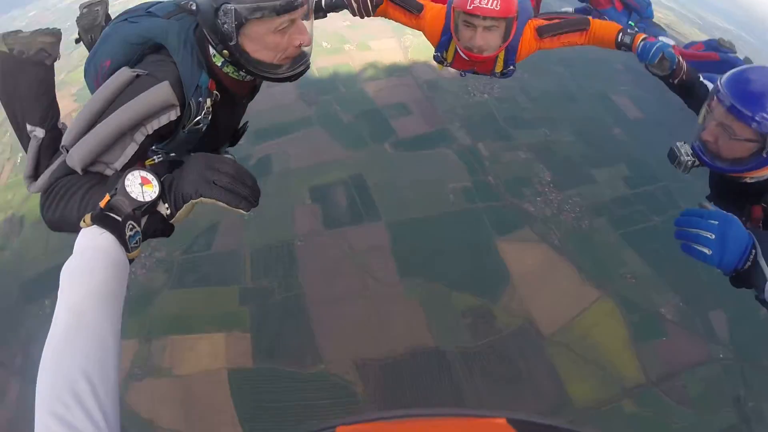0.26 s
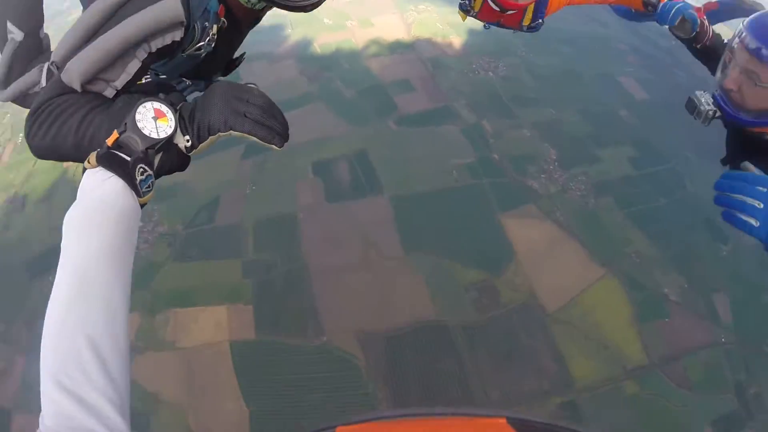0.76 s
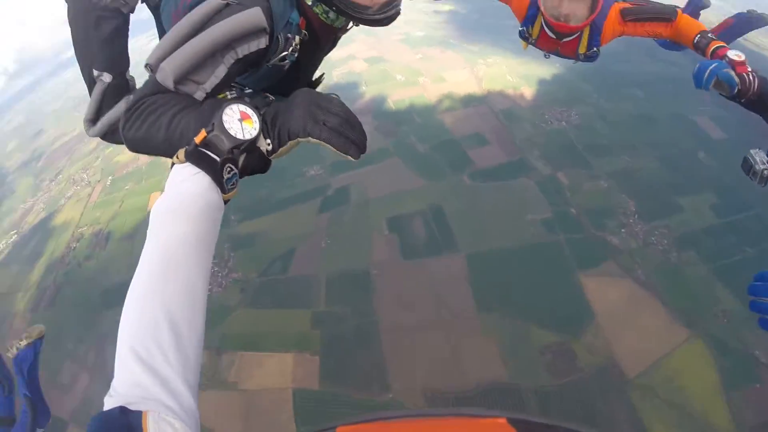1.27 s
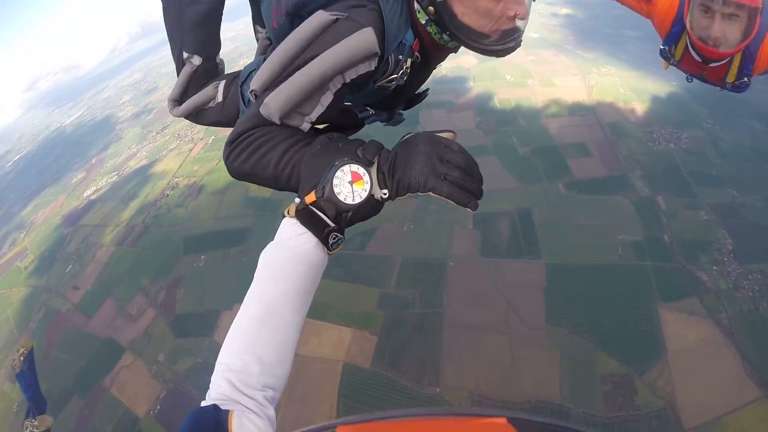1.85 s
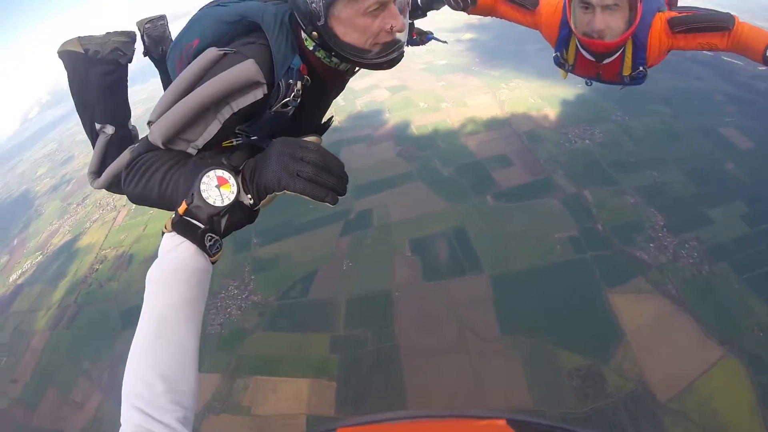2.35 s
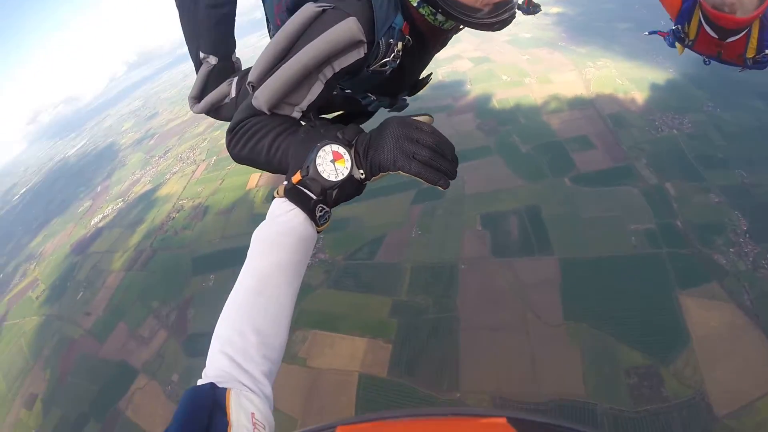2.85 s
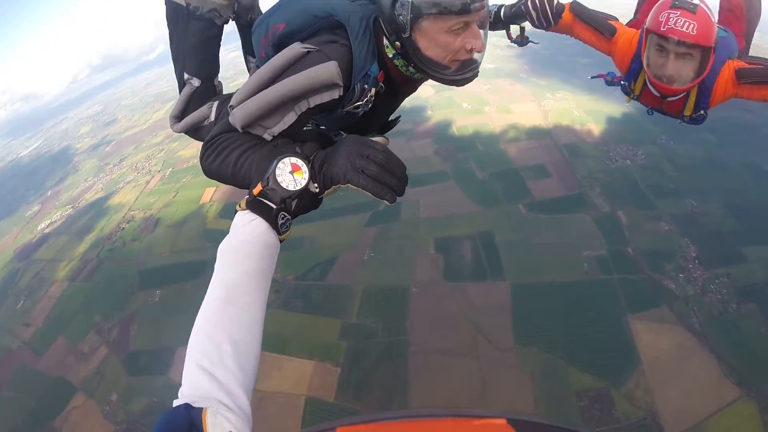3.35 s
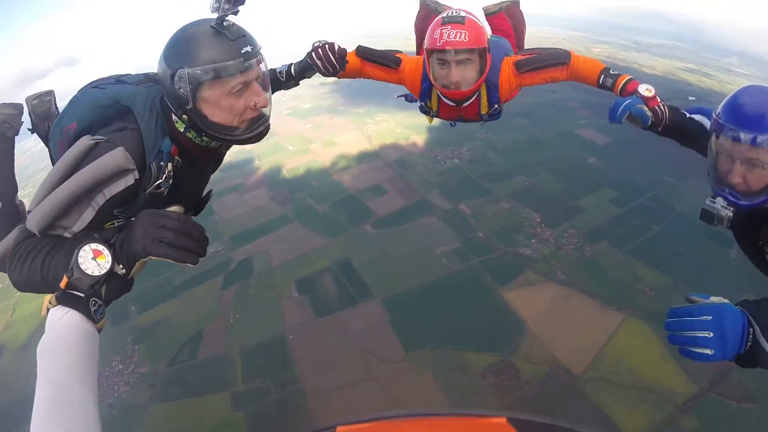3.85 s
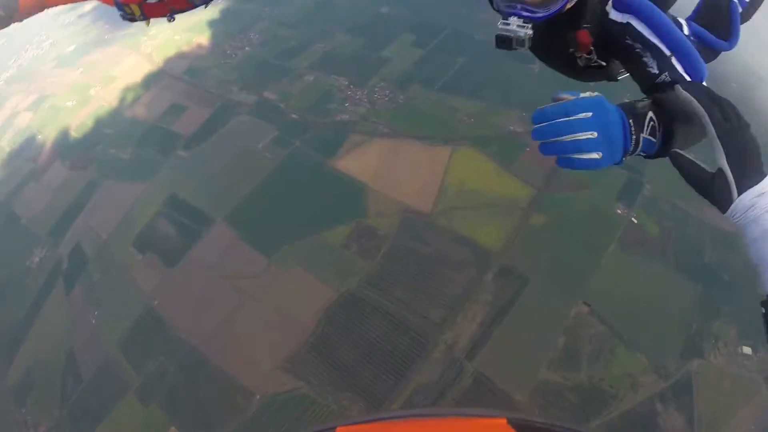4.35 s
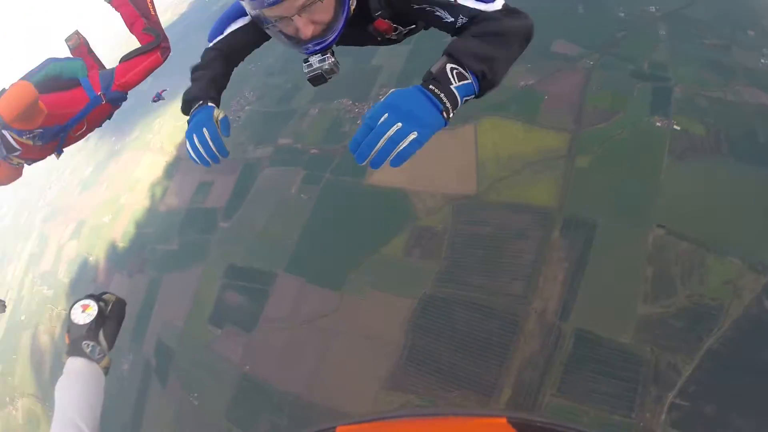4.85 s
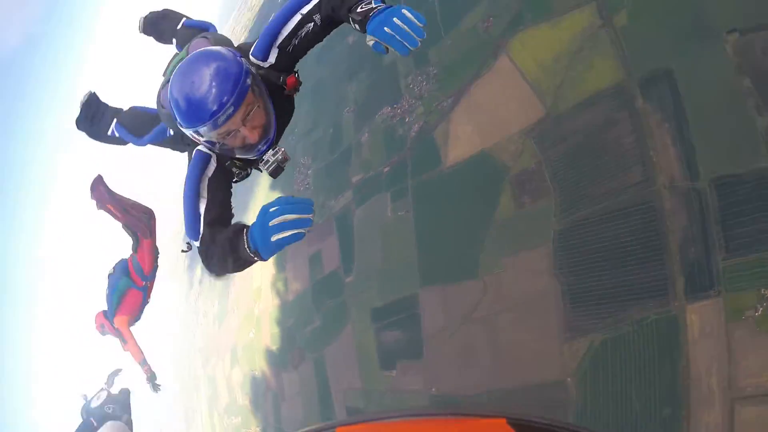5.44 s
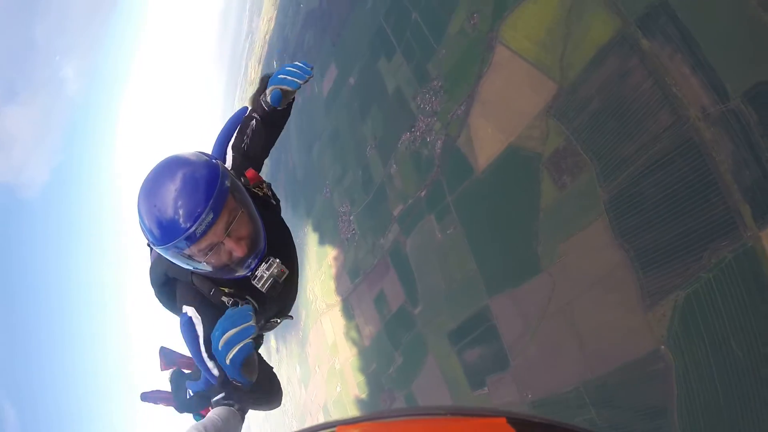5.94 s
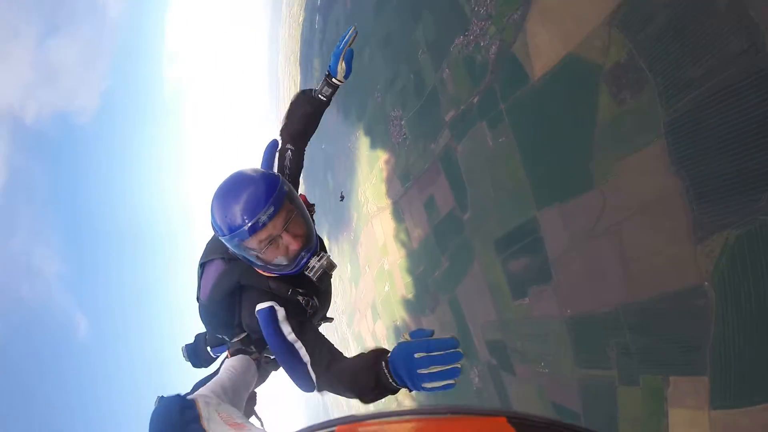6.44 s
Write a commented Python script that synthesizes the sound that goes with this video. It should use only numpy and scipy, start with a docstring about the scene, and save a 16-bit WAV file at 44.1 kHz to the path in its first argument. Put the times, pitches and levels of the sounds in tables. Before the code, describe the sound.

Loud boxy wind hiss and deep buffeting roar in open sky, stuttering with dropouts, ending as a smoother, brighter rush.

```python
"""In the open sky, in freefall: air tears past a helmet camera.
Shaped noise hisses through the resonances of the sealed case; a wavering tone near 50 Hz is the throb of eddies
shed from the helmet. Low noise roars, and hiss and roar flicker, flare and drop out in the buffeting.
A faint hum and one singing resonance add tone. Near the end the head turns out of the wake:
the rumble falls away and the hiss steadies."""
import sys
import numpy as np
from scipy import signal
from scipy.fft import rfft, irfft, next_fast_len
from scipy.io import wavfile
from scipy.ndimage import uniform_filter1d, minimum_filter1d, map_coordinates

SR = 44100
rng = np.random.default_rng(int(sys.argv[2]) if len(sys.argv) > 2 else 0)


def dump_mix(stems):
    """Bounce the given channels to the path in sys.argv[1] as a 16-bit WAV at rate SR."""
    frames = np.atleast_2d(stems).T  # one column per channel
    limited = np.clip(frames, -1, 1)  # hard clip at full scale
    pcm = np.round(limited * 32767).astype(np.int16)
    wavfile.write(sys.argv[1], SR, pcm)


N = 294588  # length in samples

# A faint, wavering low hum. Each row: time in seconds, middle pitch in Hz, middle level in dB.
HUM_PATH = [(0, 162, -46), (2.8, 164.5, -51), (3.5, 165, -33), (4.3, 160, -44), (5.7, 160.4, -42),
            (6.2, 155, -36.5), (6.68, 140.3, -36)]
# One case resonance sings out as the head turns. Each row: time in seconds, level in dB.
SINGING_LEVEL = [(0, -50), (4.1, -52), (4.35, -27), (4.6, -49), (5.3, -35), (5.6, -21), (5.8, -26),
                 (6.1, -38), (6.68, -33)]
# That resonance: its centre in Hz, its width in Hz.
SINGING_RESONANCE = (2270, 300)
# How often the helmet sheds eddies. Each row: time in seconds, middle rate in eddies a second.
SHEDDING_RATE = [(0, 55), (1.2, 54), (1.8, 49), (2.7, 55), (3.3, 52), (4.8, 53), (5.7, 60), (6.68, 62)]
# Bursts of strong shedding. Each row: centre in seconds, level in dB, rough length in seconds.
SHEDDING_BURSTS = [(0.045, -14, 0.036), (0.215, -19.5, 0.1), (0.78, -18, 0.027), (0.905, -20, 0.041),
                   (1.04, -17.5, 0.08), (1.198, -22, 0.039), (1.3, -15.5, 0.099), (1.59, -21.5, 0.069),
                   (1.681, -16.0, 0.08), (1.818, -15, 0.06), (2.014, -15.5, 0.045), (2.117, -22, 0.058),
                   (2.294, -16, 0.1), (2.417, -17, 0.052), (2.506, -16.5, 0.082), (2.6, -20, 0.043),
                   (2.687, -12.5, 0.044), (2.822, -19.0, 0.067), (3.054, -18.0, 0.033), (3.096, -12, 0.033),
                   (3.208, -16.0, 0.05), (3.275, -18.0, 0.047), (3.359, -13.5, 0.054), (3.465, -20, 0.037),
                   (3.547, -15, 0.068), (3.62, -11, 0.018), (3.758, -19, 0.035), (3.932, -18.0, 0.052),
                   (3.994, -12.5, 0.02), (4.387, -25, 0.047), (4.726, -20, 0.098), (4.831, -21, 0.04),
                   (4.93, -18.5, 0.059), (5.034, -22.0, 0.044), (5.07, -26, 0.036), (5.228, -24, 0.043)]
# Slow pressure swings under the throb. Each row: frequency in Hz, relative level in dB per Hz.
SWING_SPECTRUM = [(8, -30), (16, -3), (30, 0.5), (45, -7.5), (65, 0.5), (80, -5), (120, -47), (300, -120)]
# The wake over time. Each row: time in seconds, throb between bursts in dB, roar in dB,
# upper part of the roar in dB above the roar, flicker depth in dB (held between 0 and 9).
WAKE_PATH = [(0, -32, -28.5, -6, 4), (.6, -25, -25.5, -5, 2), (1.1, -28, -26.5, -5.5, 3),
             (1.5, -25, -25.5, -4.5, 3), (2.2, -28, -27, -6, 3.5), (3.0, -26, -27.5, -5.5, 4.5),
             (3.9, -25.5, -28, -4.5, 5.5), (4.2, -24, -27, -1.5, 2.5), (4.45, -29.5, -29.5, -5.5, 4.5),
             (5.15, -32, -29.5, -0.5, 2.1), (5.38, -28, -24.5, -2.5, 0), (5.58, -33.5, -32.5, -2.5, 1.5),
             (5.97, -29.5, -32, -9, 2), (6.05, -39, -39.5, -9, 1.2), (6.45, -38, -37.5, -6, -0.3),
             (6.68, -34.5, -33.5, -8, 0.3)]
# Spectrum of the lower roar. Each row: frequency in Hz, relative level in dB per Hz.
ROAR_SPECTRUM = [(20, -22), (70, 1), (100, 2.5), (160, -2), (220, -2.5), (300, -17), (400, -30.5),
                 (800, -120)]
# Spectrum of the upper roar. Each row: frequency in Hz, relative level in dB per Hz.
UPPER_ROAR_SPECTRUM = [(120, -120), (230, -7), (300, -2), (500, -5.5), (750, -8.5), (950, -4), (1100, -5.5),
                       (1500, -2.5), (3000, -120)]
# Sudden falls, then a climb back. Each row: start in seconds, fall of the hiss in dB, recovery in seconds.
SUDDEN_SAGS = [(.062, -5.5, 0.15), (.95, -3.5, 0.061), (1.31, -5, 0.19), (1.83, -5.5, 0.15),
               (2.69, -4.5, 0.14), (3.11, -3.5, 0.17), (3.384, -7, 0.09), (3.633, -9, 0.042),
               (3.944, -5, 0.067), (5.276, -6.5, 0.073), (5.365, -5.5, 0.14)]
# Brief flares (+) and drop-outs (-). Each row: centre in seconds, change in dB before each sound
# takes its share, length in seconds.
BRIEF_FLICKS = [(0.043, 6, 0.014), (0.063, -10, .012), (.152, -8, .009), (0.192, -6, .01),
                (0.207, -8, 0.014), (0.384, -5, .012), (0.701, -13, .009), (0.71, 5, 0.02),
                (.772, 3, 0.0069), (1.072, -9, .007), (1.632, -16, 0.017), (1.673, 4.5, .016),
                (1.689, -13, 0.0046), (1.726, -11, 0.018), (2.069, -9, 0.014), (2.118, -10, 0.01),
                (2.132, 8, 0.0098), (2.419, -21, 0.0057), (2.511, -8, 0.0062), (2.53, -11, 0.0062),
                (2.56, -9, 0.0079), (2.43, 8.5, 0.023), (2.596, 9, 0.0085), (2.678, 4, 0.013),
                (2.692, -22, 0.014), (2.723, -7, 0.013), (2.807, 9, 0.0084), (2.928, 6, 0.0068),
                (3.112, -1, 0.005), (3.138, -17, 0.0094), (3.195, 4, 0.0061), (3.259, 7.5, 0.01),
                (3.344, 9, 0.0067), (3.362, -2, 0.0064), (3.405, -7, .007), (3.442, -12, .008),
                (3.527, -4, 0.0092), (3.554, 5, 0.01), (3.614, -3, 0.011), (3.687, -15, .007),
                (3.696, 10.5, 0.016), (3.712, -9, .007), (3.833, -11, 0.011), (3.867, -12, 0.0065),
                (3.87, 14, .005), (3.9, 5, 0.0053), (3.913, -19, .007), (3.916, 9, 0.0086),
                (3.94, 11, 0.0064), (3.967, -20, 0.032), (3.978, 12, .011), (4.006, -10, 0.025),
                (4.022, 8.5, 0.0091), (4.493, 6, 0.0054), (4.558, 3.5, 0.0079), (4.593, -8, 0.032),
                (4.721, 4, .008)]
# The hiss over time. Each row: time in seconds, hiss in dB, then in dB above the hiss: the lower case
# resonances, the treble, and the top air (which is counted above the treble).
HISS_PATH = [(0, -16, 1, 2, 1), (.6, -16, 1.5, 3.5, -1), (1.2, -16, 0, 4, 0.5), (1.65, -17, 2, 0, 1),
             (2.3, -17.5, 1.5, 2, 1), (2.9, -17.5, 1.5, -0.5, 2.5), (3.5, -17.5, 2.5, 2.6, 1),
             (4.0, -17, 3, -2.2, 0), (4.04, -16, 1, 4, 2), (4.4, -15, -3, 3.5, -2.5),
             (5.1, -15.5, 2, 1.7, 4), (5.3, -17, 0.8, 0, 3), (5.54, -18.5, -2, 3.5, 4),
             (5.61, -14, -4.5, 0, 5), (5.95, -14, -3, 2.5, 4), (6.1, -13, -3.5, -4, 4.5),
             (6.5, -14, -4, -0.5, -0.5), (6.68, -16.5, -3.5, 1.5, 5)]
# Resonances of the case. Each row: centre in Hz, width in Hz, relative level in dB.
CASE_RESONANCES = [(1383.5, 148, 2), (1566, 467, -4.5), (1793, 430, -5), (2324, 500, -3.5), (2700, 800, -4),
                   (2984, 670, 0), (3439, 480, -1.5), (4075, 370, -9.5), (5754, 820, -10.5),
                   (6265, 730, -14.5), (7190, 600, -21.5), (9660, 730, -30.5), (10660, 900, -30)]
# Cancellations between them. Each row: centre in Hz, width in Hz, depth in dB.
CASE_NOTCHES = [(2130, 170, 3), (3210, 130, 4), (3785, 190, 9)]
# Leakage between and beyond the resonances. Each row: frequency in Hz, relative level in dB per Hz.
CASE_LEAK = [(600, -70), (1000, -40), (1250, -10), (4800, -21), (8500, -31.5), (11500, -42.5), (13200, -39),
             (14300, -49), (15100, -51), (15400, -60)]

TOP_HZ = 15434  # nothing is left above this
THROB_SURGE_DB, DRIFT_DB = 2.8, 0.45  # random swells of the throb; slow drift of each hiss band
THROB_SAG, ROAR_SAG = 0.95, 0.75  # shares of a sag, in dB, felt by the throb and the roar
RISE_SHARE = 0.37  # part of a flick's length spent rising: the hiss comes up faster than it goes down


def amp(db):
    """Turn dB into a plain gain."""
    return 10 ** (np.asarray(db) / 20)


def unit(x):
    """Scale to an average (rms) strength of 1."""
    return x / np.sqrt(np.mean(x ** 2) + 1e-20)


def along(points, hz):
    """Read a curve of (Hz, value) points on a log frequency axis."""
    f, v = np.transpose(points)
    return np.interp(np.log(hz + 1), np.log(f + 1), v)


def curves(rows):
    """One value per sample for each column after the time."""
    s, *columns = np.transpose(rows)
    return [np.interp(np.arange(N) / SR, s, c) for c in columns]


def wobble(rate):
    """A smooth random curve through rate random points a second."""
    knots = rng.standard_normal(N // 20)[:int(N * rate / SR) + 4]
    return map_coordinates(knots, [np.arange(N) * rate / SR])


def filtered(x, response):
    """Multiply the spectrum of x by a response to frequency."""
    m = next_fast_len(N + SR // 2)
    return irfft(rfft(x, m) * response(np.fft.rfftfreq(m, 1 / SR)), m)[:N]


def above(hz, edge_hz):
    """Share from 0 to 1 that lies over an edge, one half near the edge itself."""
    return 1 / (1 + (edge_hz / (hz + 1)) ** 8)


def bump(hz, centre_hz, width_hz):
    """Power of a steep resonance, 1 at its centre."""
    return 1 / (1 + (2 * (hz - centre_hz) / width_hz) ** 2) ** 2


def patchy(patchy_db):
    """Turbulence as white noise with patches of random gain in time and frequency."""
    z = signal.stft(rng.standard_normal(N), nperseg=256)[2]
    field = uniform_filter1d(rng.standard_normal(z.shape), size=8, axis=1)
    field = uniform_filter1d(field, size=6, axis=0)
    return signal.istft(z * amp(patchy_db * unit(field)), nperseg=256)[1][:N]


def hum():
    """A faint fuzzy tone, uncovered when the roar falls: a sine with wandering pitch and level."""
    pitch_hz, level_db = curves(HUM_PATH)
    phase = 2 * np.pi * np.cumsum(pitch_hz * (1 + 0.0429 * wobble(25))) / SR
    return amp(level_db + 2.2 * wobble(20)) * np.sin(phase)


def singing():
    """Narrow noise in the resonance that the turned airstream blows across."""
    level_db, = curves(SINGING_LEVEL)
    tone = filtered(rng.standard_normal(N), lambda hz: np.sqrt(bump(hz, *SINGING_RESONANCE)))
    return amp(level_db) * unit(tone)


def sags():
    """A sudden fall and a straight climb back, in dB."""
    t = np.arange(N) / SR
    fall = sum(db * (t >= s) * np.clip(1 - (t - s) / recovery, 0, 1) for s, db, recovery in SUDDEN_SAGS)
    return uniform_filter1d(fall, size=SR // 150)


def throb():
    """Eddies shed about fifty times a second: a cycle of wandering rate and size, over slower swings."""
    t = np.arange(N) / SR
    between = amp(curves(WAKE_PATH)[0] + THROB_SURGE_DB * wobble(11) + THROB_SAG * sags())
    bursts = sum(amp(2 * db) * np.exp(-np.abs(2.4 * (t - s) / length) ** 2.8)
                 for s, db, length in SHEDDING_BURSTS)
    level = np.sqrt(between ** 2 + bursts)  # powers add
    rate_hz, = curves(SHEDDING_RATE)
    phase = 2 * np.pi * np.cumsum(rate_hz * (1 + 0.0706 * wobble(9) + 0.1704 * wobble(38))) / SR
    cycle = unit(np.sin(phase) * amp(0.42 * wobble(24.05)))
    swings = unit(filtered(rng.standard_normal(N), lambda hz: amp(along(SWING_SPECTRUM, hz))))
    gust = uniform_filter1d(level, size=SR // 4)  # the swings follow the gusts, not each burst
    shed = filtered(level * cycle, lambda hz: 1 - above(hz, 92))
    return shed + amp(-7) * gust * swings


def puffs(rate, decay):
    """Small eddies, rate a second, that strike at once and die away over decay seconds; rms 1."""
    hits = (rng.random(N) < rate / SR) * rng.exponential(size=N)
    shape = np.exp(-np.arange(SR // 10) / SR / decay)
    struck = uniform_filter1d(signal.fftconvolve(hits, shape)[:N], size=SR // 700)
    return unit(struck - struck.mean())


def flicks():
    """Brief flares and drop-outs with steep edges, in dB."""
    t = np.arange(N) / SR
    out = np.zeros(N)
    for s, db, length in BRIEF_FLICKS:
        near = slice(max(round(s * SR) - SR // 10, 0), round(s * SR) + SR // 10)
        u = t[near] - s
        rising = u * db < 0  # before a flare's centre, or after a drop-out's
        side = length * np.where(rising, RISE_SHARE, 1 - RISE_SHARE)
        out[near] += db * np.exp(-.7 * np.abs(u / side) ** 3.5)
    return out


def buffeting(push):
    """The flicker of the wake that hiss and roar share, as a change in dB."""
    depth_db = curves(WAKE_PATH)[3]
    eddies = 0.33 * wobble(25) + 0.24 * wobble(70) + 0.5 * wobble(200) + 0.82 * wobble(800)
    eddies = eddies - 0.11 * eddies ** 2  # lulls are deeper than flares are high
    flicker = np.clip(depth_db, 0, 9) * (eddies + 0.48 * puffs(45, 0.0079))
    # take out its own half-second average power
    flicker -= 10 * np.log10(uniform_filter1d(amp(2 * flicker), size=SR // 2))
    return flicks() + flicker + 11.5 * push  # the hiss rides on the crests of the throb


def roar(change):
    """Low turbulence in two bands; the upper one follows the buffeting more strongly."""
    roar_db, upper_db = curves(WAKE_PATH)[1:3]
    air = patchy(patchy_db=1.5) * amp(0.15 * change + 0.66 * wobble(18))
    upper = unit(filtered(air * amp(0.31 * change), lambda hz: amp(along(UPPER_ROAR_SPECTRUM, hz))))
    lower = unit(filtered(air, lambda hz: amp(along(ROAR_SPECTRUM, hz))))
    return amp(roar_db + ROAR_SAG * sags() + 1.46 * wobble(7)) * (lower + amp(upper_db) * upper)


def case(hz):
    """Gain of the camera case between the airstream and the microphone: leakage, resonances, notches."""
    power = amp(2 * along(CASE_LEAK, hz)) + sum(amp(2 * db) * bump(hz, c, w) for c, w, db in CASE_RESONANCES)
    return np.sqrt(power) / amp(sum(db * bump(hz, c, w) for c, w, db in CASE_NOTCHES))


def hiss(change):
    """Turbulence drives the case in four bands; the treble swings more with the buffeting than the bass."""
    drift = DRIFT_DB * np.array([wobble(8) for band in range(4)])
    hiss_db, lower_db, treble_db, top_db = curves(HISS_PATH) + drift
    hiss_db = hiss_db + sags()
    low_hz, mid_hz, top_hz = 2150, 4900, 8500  # edges between the bands
    air = patchy(patchy_db=0.75)
    scale = np.std(filtered(air, case))
    lower = filtered(air * amp(0.5 * change + lower_db + hiss_db),
                     lambda hz: case(hz) * (1 - above(hz, low_hz)))
    middle = filtered(air * amp(0.57 * change + hiss_db),
                      lambda hz: case(hz) * (above(hz, low_hz) - above(hz, mid_hz)))
    bright = air * amp(0.85 * change + treble_db + hiss_db)
    treble = filtered(bright, lambda hz: case(hz) * (above(hz, mid_hz) - above(hz, top_hz)))
    top = filtered(bright * amp(top_db - 0.097 * change), lambda hz: case(hz) * above(hz, top_hz))
    # distant air that never drops out
    far = filtered(patchy(patchy_db=2.5), lambda hz: case(hz) * (amp(-42.0) + amp(-41) * above(hz, mid_hz)))
    return (lower + middle + treble + top + far) / scale


def scene():
    """Add the layers; the throb also pushes the hiss and the roar up and down."""
    push = throb()
    change = buffeting(push)
    return (hum() + singing() + push + roar(change) + hiss(change))[None]


def record(dry):
    """A limiter holds the tallest peaks down, then the band limit."""
    ceiling, span = .9, SR // 250  # full scale is 1; span in samples
    needed = np.minimum(1, ceiling / (np.abs(dry[0]) + 1e-9))
    gain = uniform_filter1d(minimum_filter1d(needed, size=span), size=span)
    return filtered(dry[0] * gain, lambda hz: hz < TOP_HZ)[None]


dry = scene()
out = record(dry)
dump_mix(out)
```